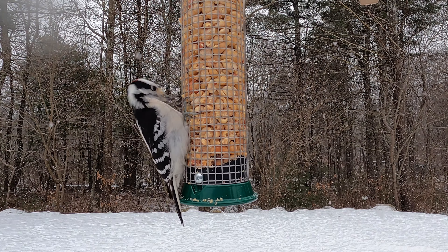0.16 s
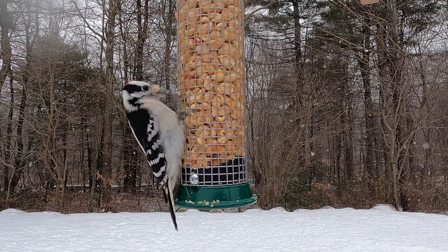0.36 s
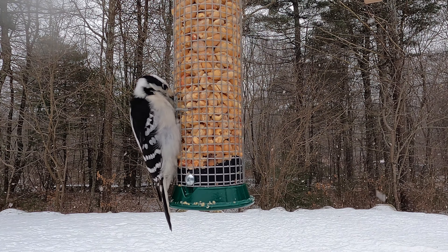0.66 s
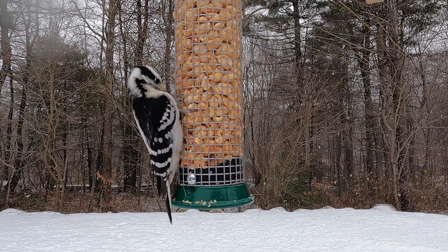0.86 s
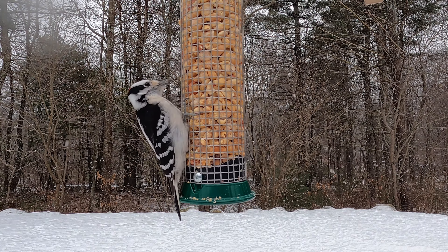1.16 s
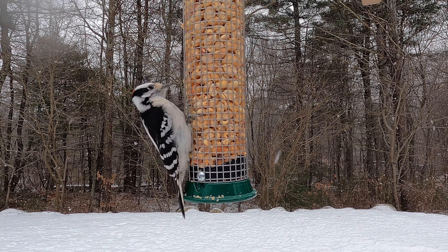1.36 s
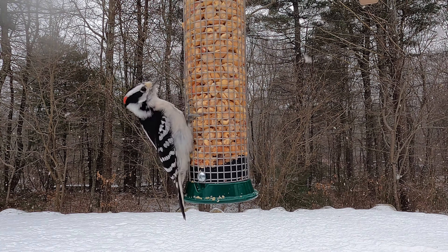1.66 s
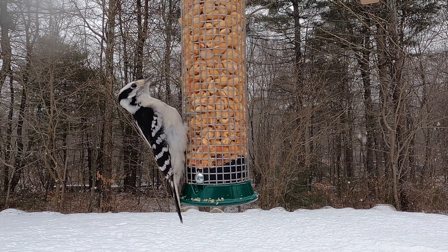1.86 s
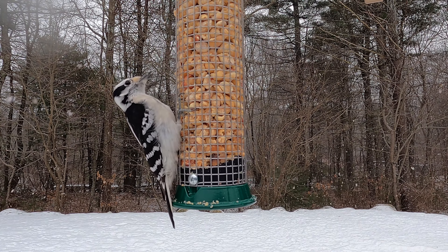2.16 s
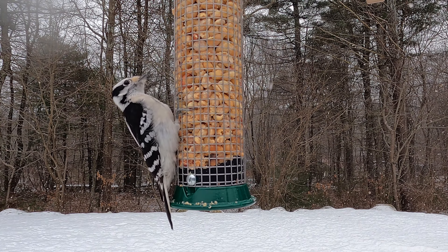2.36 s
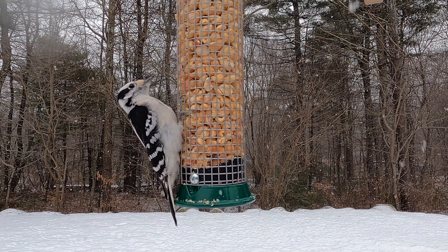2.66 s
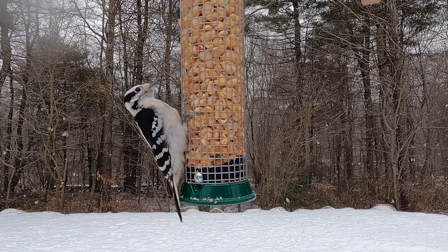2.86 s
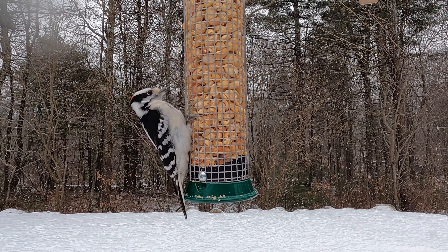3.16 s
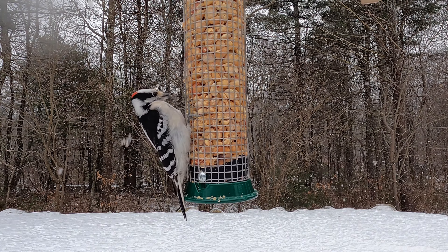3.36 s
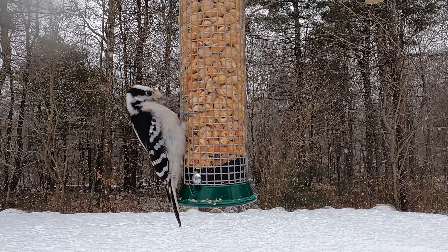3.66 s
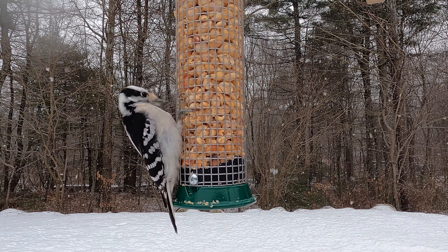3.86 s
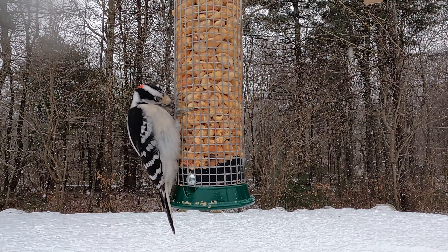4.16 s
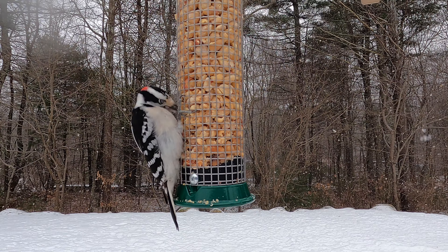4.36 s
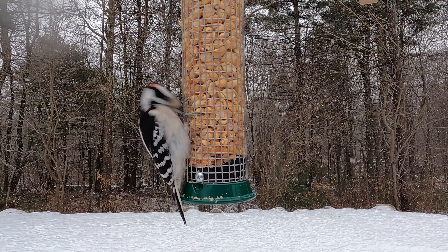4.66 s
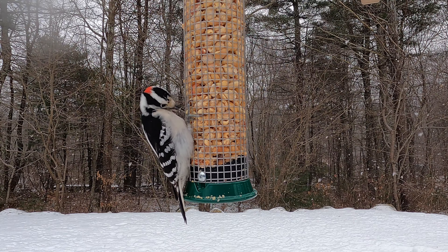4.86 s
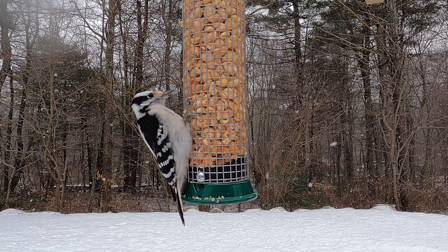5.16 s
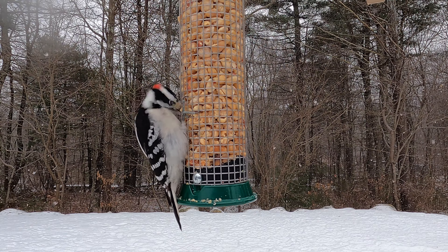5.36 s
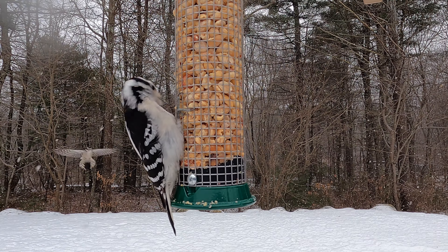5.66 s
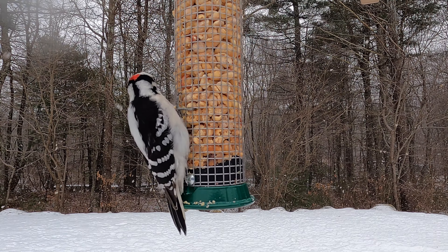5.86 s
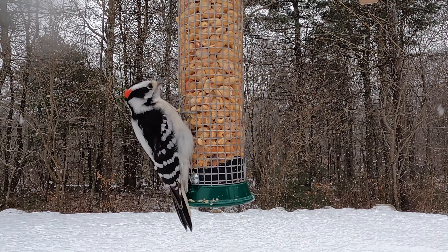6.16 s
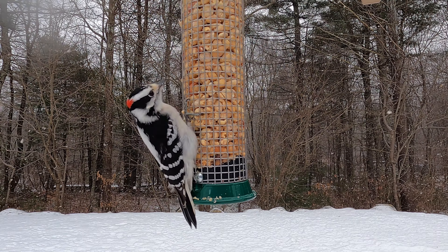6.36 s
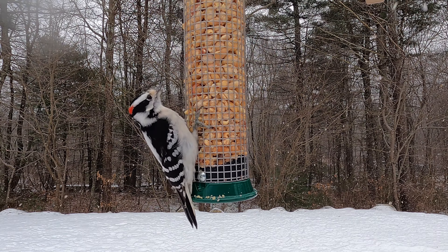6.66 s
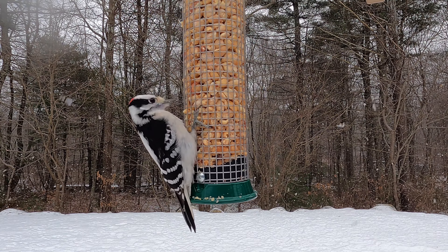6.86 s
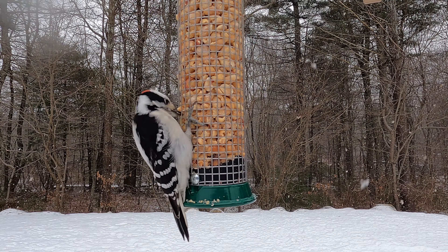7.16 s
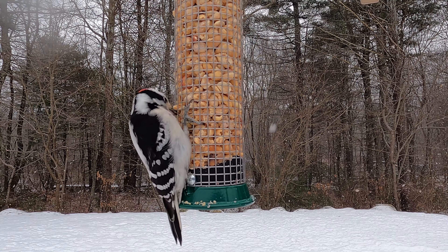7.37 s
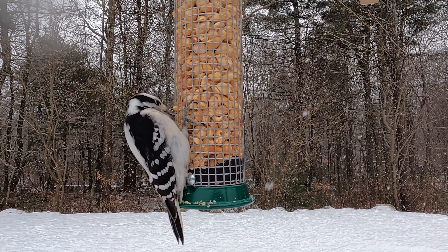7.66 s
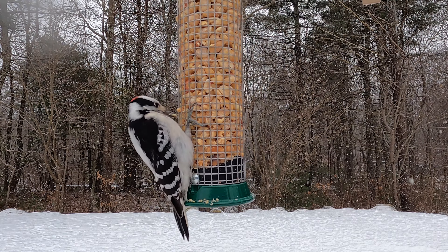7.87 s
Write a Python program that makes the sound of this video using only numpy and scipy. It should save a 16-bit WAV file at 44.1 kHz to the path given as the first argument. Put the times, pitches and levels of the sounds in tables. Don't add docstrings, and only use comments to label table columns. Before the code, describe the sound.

A small woodpecker pecks sharply at peanuts in a wire feeder while small birds chirp, and a second bird clatters in over low wind rumble.

```python
import sys
import numpy as np
from scipy import signal
from scipy.fft import rfft, irfft, next_fast_len
from scipy.io import wavfile
from scipy.ndimage import uniform_filter1d, map_coordinates

SR = 44100
rng = np.random.default_rng(int(sys.argv[2]) if len(sys.argv) > 2 else 0)


def master_out(mix):
    frames = np.transpose(np.atleast_2d(mix))
    ceiling = np.clip(frames, -1, 1)
    pcm = np.round(ceiling * 32767).astype(np.int16)
    wavfile.write(sys.argv[1], SR, pcm)


def volts_from_decibels(level):
    exponent = np.asarray(level, float) / 20
    return 10 ** exponent


N = 353461
OPPOSITE = np.array([[1], [-1]])


def shape(x, points):
    size = next_fast_len(x.shape[-1])
    hz, db = np.transpose(points)
    bins_hz = np.arange(size // 2 + 1) * SR / size
    gain = volts_from_decibels(np.interp(np.log(bins_hz + 1), np.log(hz), db))
    return irfft(rfft(x, size) * gain, size)[..., :x.shape[-1]]


def band(x, hz, width_hz):
    return signal.lfilter(*signal.iirpeak(min(hz, .45 * SR), hz / width_hz, fs=SR), x)


def twice(x, hz, width_hz):
    return band(band(x, hz, width_hz), hz, width_hz)


def unit(x):
    return x / np.sqrt(np.mean(x ** 2))


def walk(rate):
    k = int(SR / rate)
    held = np.repeat(rng.standard_normal(N // k + 1), k)
    return 2.6 * uniform_filter1d(uniform_filter1d(held, k), k)[:N]


def add(track, s, x):
    i = int(s * SR)
    track[i:i + len(x)] += x[:N - i]


def swells(t, rows, bed_db, colour_db, steps, rise):
    total = volts_from_decibels(np.array(bed_db))[:, None] ** 2
    for s, ms, db, tilt_db in rows:
        fade_db = -12000 * np.maximum(t - s, (s - t) / rise) / ms
        tint_db = (colour_db + tilt_db * np.array(steps))[:, None]
        total = total + volts_from_decibels(db + fade_db + tint_db) ** 2
    return 10 * np.log10(total)


def grit(size, grain_db):
    return rng.standard_normal(size) * volts_from_decibels(grain_db * np.minimum(rng.exponential(size=size), 3))


# f/Hz, level/dB
UNLIKE = [(30, -22), (70, -34), (140, -9.5), (260, -10.5), (600, -7), (2000, -7), (8000, -6.5), (13000, 1)]


def pair():
    mid, side = rng.standard_normal((2, N))
    return mid + shape(side, UNLIKE) * OPPOSITE


# f/Hz, level/dB
WIND_TONE = [(8.8, -28), (15, 2.5), (27, 0.5), (41, -1.5), (86, 3), (291, -24), (400, -32), (650, -39),
             (1100, -100)]
# f/Hz, level/dB
WIND_BANDS = [
    [(42, 0), (50, -4), (65, -30)],
    [(38, -30), (50, -4), (60, 0), (110, 0), (130, -4), (170, -30)],
    [(100, -30), (130, -4), (155, 0)],
]
# t/s, fade/ms, strength/dB, slow buffeting over the strength/dB
GUSTS = [(.2, 160, -55.5, 5.5), (.8, 210, -57, 2), (1.76, 230, -47, -3), (2.03, 340, -48, 6.5),
         (2.882, 104, -39, 2), (4.13, 170, -49.5, -2.5), (4.53, 540, -55, 3), (5.1, 320, -55, -7),
         (5.6, 330, -52.5, -13.5), (5.99, 270, -46.5, 1.5), (6.25, 350, -54, -15), (6.75, 173, -45.5, 4.5),
         (7.05, 310, -51.5, 5.5), (7.62, 120, -56, -2)]


def wind():
    noise = shape(pair(), WIND_TONE)
    t = np.arange(0, N, 16) / SR
    levels = swells(t, GUSTS, bed_db=(-58.5, -57.5, -64), colour_db=(0, -2, -8.5),
                    steps=(0.93, 0, -0.52), rise=0.79)
    levels = np.repeat(levels, 16, axis=1)[:, :N]
    out = np.zeros((2, N))
    for db, part in zip(levels, WIND_BANDS):
        throb_db = 1.26 * walk(14)
        out += unit(shape(noise, part)) * volts_from_decibels(db + throb_db)
    return out


def sleet():
    hits = (rng.random(N) < 7 / SR) * volts_from_decibels(-50 + 2 * rng.standard_normal(N))
    return twice(hits, 11500, 900.) + volts_from_decibels(-22) * band(hits, 7000., 6000.)


# f/Hz, level/dB
CRACKLE_TONE = [(150, -32), (260, -1.5), (750, -3.5), (1200, 6), (2000, 2.5), (3000, 3), (4000, 4.5),
                (8000, 2), (9300, -6), (12500, -6)]
# t/s, fade/ms, level/dB, brightness per step up the colours/dB
STIRS = [(.1, 810, -81, 5.5), (.62, 350, -77, 5), (1.23, 310, -71, 2.5), (1.45, 150, -72, -0.5),
         (1.74, 190, -69, -0.5), (1.83, 260, -64.5, -8), (1.97, 224, -64, -1.5), (2.9, 76, -65.5, -1),
         (3.3, 170, -79, 1.5), (4.02, 230, -66, -4.5), (4.25, 207, -62, -3.5), (5.0, 1130, -72, -2),
         (5.62, 440, -67.5, -2), (5.958, 265, -60, -2), (6.11, 30, -70.5, -11), (6.235, 89, -50, -2),
         (6.3, 360, -62, -7.5), (6.72, 310, -65.5, -1), (7.1, 180, -66, -6), (7.35, 130, -73, -6),
         (7.563, 106, -55, -5), (7.95, 290, -78.5, 3.5)]


def rustle():
    colour_hz, width_hz = (470., 1500., 5800., 10500.), (650., 1600., 3000., 4500.)
    t = np.arange(0, N, 128) / SR
    levels = swells(t, STIRS, bed_db=(-77.5, -81, -84, -81), colour_db=(-3, 0.5, -2.5, -7),
                    steps=(-1.47, 0.76, 1.92, 1.2), rise=0.83)
    per_hz = levels - 10 * np.log10(width_hz)[:, None]
    noise = shape(pair() * volts_from_decibels(2.32 * rng.exponential(size=N)), CRACKLE_TONE)
    hz, s, cells = signal.stft(noise, SR, nperseg=512, noverlap=384)
    place = np.interp(np.log(hz + 1), np.log(colour_hz), range(4))
    grid = np.meshgrid(place, np.arange(len(s)), indexing="ij")
    patches = rng.standard_normal((12, len(s)))
    patches = unit(uniform_filter1d(uniform_filter1d(patches, size=9), size=9))
    db = map_coordinates(per_hz, grid, order=1, mode="nearest")
    db += 2.4 * map_coordinates(patches, [grid[0] * 11 / 3, grid[1]], order=1)
    out = signal.istft(cells * volts_from_decibels(db + 36.5), SR, nperseg=512, noverlap=384)[1][:, :N]
    return out * volts_from_decibels(.8 * walk(50))


WOBBLE = .005
# t/s, length/ms, first f/Hz, last f/Hz, level/dB
FALLS = [
    (1.545, 30, 3800, 3300, -67.5),
    (1.665, 28, 3770, 3050, -62),
    (4.367, 49.7, 4560, 3120, -39),
    (4.485, 55, 4400, 2830, -42.5),
    (7.646, 55, 4630, 3570, -62.5),
    (7.804, 50, 4470, 3420, -66.5),
]
# t/s, length/ms, first f/Hz, last f/Hz, level/dB
HELD = [
    (6.526, 32, 4270, 3340, -50),
    (6.646, 43, 4450, 3420, -46),
]
# t/s, level/dB
FAR_FALLS = [(.415, -72), (0.863, -67.5), (3.405, -80), (3.535, -80), (3.672, -78.5), (4.015, -68.5),
             (6.827, -63.5)]
# t/s, length/ms, first f/Hz, last f/Hz, level/dB
RISES = [
    (.102, 31, 2350, 3100, -74),
    (3.776, 59, 2410, 3770, -50.5),
]
# t/s, length/ms, first f/Hz, last f/Hz, level/dB
SEEPS = [(.172, 30, 3600, 2800, -74), (1.226, 30, 7000, 7400, -73), (1.262, 22, 4400, 4600, -72),
         (1.38, 32, 4450, 4900, -62), (1.922, 46, 2800, 4030, -52), (2.305, 49, 2900, 3840, -72),
         (2.853, 33, 2350, 3950, -54), (2.884, 15, 3950, 3860, -58), (2.868, 16, 6400, 7640, -67),
         (2.92, 18, 2000, 2190, -63.5), (3.105, 36, 2730, 3720, -56), (3.125, 17, 5800, 5720, -66),
         (3.772, 10, 4700, 5100, -68), (3.915, 46, 7100, 8000, -70), (4.35, 22, 7300, 7700, -70),
         (4.63, 29, 7200, 8000, -83), (7.235, 36, 8000, 5740, -76), (7.31, 31, 7540, 6100, -79),
         (7.788, 27, 7300, 7900, -72)]
# t/s, length/ms, first f/Hz, last f/Hz, level/dB
BUZZES = [(.718, 10, 6900, 8200, -69), (1.345, 22, 4650, 5000, -64), (1.39, 18, 4700, 4850, -64),
          (1.503, 20, 5450, 5700, -69), (1.926, 24, 5700, 6900, -63), (3.737, 38, 5600, 5300, -70),
          (3.739, 40, 2140, 1750, -70), (3.768, 16, 6800, 7900, -74), (3.786, 13, 5000, 3900, -71)]
# t/s, length/ms, first f/Hz, last f/Hz, level/dB
REEDS = [
    (3.947, 44, 2450, 3200, -60),
    (6.544, 15.7, 2690, 2520, -54),
]


def whistles():
    out, wobble, hoarse = np.zeros(N), 1 + WOBBLE * walk(400), walk(700)
    far = [(s, 46, 4200, 3130, db) for s, db in FAR_FALLS]
    fall_db, rise_db, reed_db, pure_db = (-21.5, -31, -55), (-13, -34, -28), (-6, -40, -32), (-30, -60, -60)
    kinds = [(FALLS, fall_db, .1, 1.3), (HELD, fall_db, .1, .35), (RISES, rise_db, .1, 1.3),
             (REEDS, reed_db, .15, .5), (SEEPS, pure_db, .2, .7), (far, pure_db, .4, .7),
             (BUZZES, pure_db, .55, .6)]
    mirror_hz = 24000
    for rows, over_db, rough, power in kinds:
        for s, ms, first_hz, last_hz, db in rows:
            u = np.linspace(0, 1, int(ms * SR / 1000))
            here = slice(int(s * SR), int(s * SR) + len(u))
            glide = u + 0.023 * np.sin(2 * np.pi * u + np.pi)
            hz = first_hz + (last_hz - first_hz) * glide
            phase = 2 * np.pi * np.cumsum(hz * wobble[here]) / SR + rough * hoarse[here]
            swell = np.sin(np.pi * u ** 1.08) ** power
            low = (u if last_hz < first_hz else 1 - u) ** 0.88
            mirror = volts_from_decibels(-5) * np.sin(2 * np.pi * mirror_hz * u * ms / 1000 - 3 * phase)
            third = (np.sin(3 * phase) + mirror) * np.clip((mirror_hz / 2 - 3 * hz) / 300, 0, 1)
            overtones = [2 * low * np.sin(2 * phase), third, np.sin(4 * phase)]
            tone = np.sin(phase) + volts_from_decibels(over_db) @ overtones
            add(out, s, np.sqrt(2) * volts_from_decibels(db) * tone * swell)
    return out * volts_from_decibels(.7 * walk(200))


# t/s, low voice f/Hz, high voice f/Hz, low level/dB, high level/dB
ARCH = [(1.341, 2290, 3720, -63, -57), (1.365, 2540, 3890, -60, -54), (1.383, 2820, 4080, -52.5, -59),
        (1.415, 2980, 4250, -54, -55), (1.445, 2950, 4380, -51.5, -59), (1.452, 2880, 4200, -53, -62),
        (1.485, 2895, 4200, -54, -65), (1.503, 2734, 4240, -58, -87), (1.525, 2900, 4100, -57, -90)]
# t/s, length/s, first f of the low voice/Hz, level/dB
CHIPS = [
    (0.719, 0.039, 3130, -47),
    (4.248, 0.037, 3106, -41),
]
# t as share of length, low f and high f as shares of the first, low level/dB, high level/dB
CHIP_COURSE = [(0, 1, 1.43, -18, -32), (.22, .97, 1.4, -4, -9), (.42, .92, 1.31, 0, -4),
               (.7, 0.85, 1.2, -3, -4), (.85, .83, 1.2, -9, -5), (1, 0.85, 1.21, -20, -16)]
MIXES = [(2, 0), (0, 2), (-1, 1), (-1, 2), (1, 1), (1, 2), (0, 3), (2, 2)]


def two_voiced_calls():
    out, waver = np.zeros(N), walk(260)
    chip_mix_db = (-16, -16, -24, -15, -30, -34, -36, -38)
    arch_mix_db = (-12, -36, -30, -30, -34, -40, -40, -40)
    calls = [(ARCH, arch_mix_db, 1.5)]
    for s, length, hz, db in CHIPS:
        note = [(s + u * length, hz * low, hz * high, db + low_db, db + high_db)
                for u, low, high, low_db, high_db in CHIP_COURSE]
        calls.append((note, chip_mix_db, 2.5))
    times = np.array(MIXES)
    share = np.abs(times) / np.abs(times).sum(axis=1, keepdims=True)
    for note, mix_db, rough_db in calls:
        s, *columns = np.transpose(note)
        t = np.arange(s[0], s[-1], 1 / SR)
        smooth = np.array([uniform_filter1d(np.interp(t, s, c), size=150, mode="nearest") for c in columns])
        voices_hz, voices_db = smooth[:2], smooth[2:]
        rough = np.array([waver[int((s[0] + k / 20) * SR):][:len(t)] for k in range(10)])
        phase = 2 * np.pi * np.cumsum(voices_hz * (1 + .5 * WOBBLE * rough[:2]), axis=1) / SR
        tone = np.sum(volts_from_decibels(voices_db + .7 * rough[:2]) * np.sin(phase), axis=0)
        level = share @ voices_db + np.array(mix_db)[:, None] + rough_db * rough[2:]
        tone = tone + np.sum(volts_from_decibels(level) * np.sin(times @ phase + .6 * rough[2:]), axis=0)
        add(out, s[0], tone * signal.windows.tukey(len(t), .15))
    return out


def trunks(x):
    t = np.arange(SR // 2) / SR
    tail = rng.standard_normal((2, len(t))) * 1000. ** (-t / .3) * np.minimum(t / .012, 1)
    tail = tail / np.sqrt(np.sum(tail ** 2) / 2)
    return volts_from_decibels(-17) * signal.fftconvolve(x[None], tail, axes=1)[:, :N]


# t/s, length/ms, f/Hz,
# width/Hz, level/dB
SCRAPES = [(0.53, 90, 7700, 2300, -68), (1.342, 86, 7600, 1500, -66), (1.4, 190, 264, 130, -67),
           (1.675, 113, 1660, 130, -61), (1.684, 127, 1250, 200, -61), (1.691, 98, 2820, 900, -66.5),
           (1.78, 58, 980, 700, -59), (1.872, 85, 2100, 450, -59), (1.872, 64, 2820, 400, -58),
           (1.95, 102, 2000, 350, -60.5), (1.964, 79, 2660, 500, -60), (1.821, 160, 890, 900, -64),
           (5.597, 40, 2800, 302, -61.5), (5.488, 32, 3460, 900, -60.5), (2.79, 147, 1100, 1830, -64),
           (3.068, 76, 3370, 6000, -72.5), (2.458, 104, 576, 510, -72.5), (3.221, 200, 1330, 1400, -76.5),
           (5.071, 102, 2000, 3000, -68), (5.44, 37, 2850, 1690, -62), (6.117, 18, 7600, 6000, -51),
           (6.212, 40, 1500, 398, -43), (6.614, 30, 4740, 4000, -63), (6.94, 134, 6640, 300, -66),
           (6.953, 11, 10900, 4000, -58), (7.007, 20, 11500, 3100, -57), (7.33, 71, 760, 200, -68),
           (7.52, 70, 520, 400, -61.5), (7.521, 73, 1250, 300, -62)]


def scrapes():
    out = np.zeros(N)
    for s, ms, hz, width_hz, db in SCRAPES:
        drag = unit(twice(grit(16384, 1.5), hz, 1.2 * width_hz))[:int(ms * SR / 1000)]
        add(out, s, volts_from_decibels(db) * drag * signal.windows.tukey(len(drag), .2))
    return out * volts_from_decibels(.6 * walk(90))


# t/s, level/dB, drive/ms
RINGS = [(0.069, -77, 18), (.248, -65.5, 42), (1.013, -73.5, 65), (1.242, -66.5, 16), (1.337, -70.5, 38),
         (4.725, -70, 26), (4.875, -71.5, 29), (5.049, -72.5, 32), (5.49, -66.5, 36), (5.598, -70, 61),
         (5.685, -64.5, 43), (5.855, -69.5, 45), (6.76, -65.5, 16)]
# f/Hz, level/dB, t60/s
MESH_MODES = [(1907, 4, 0.15), (2060, -6.5, 0.012), (1780, -7, 0.15)]


def mesh():
    drive, t = np.zeros(N), np.arange(8192) / SR
    for s, db, ms in RINGS:
        add(drive, s, volts_from_decibels(db + 33.0) * rng.standard_normal(8192) * np.exp(-1000 * t / ms))
    return sum(volts_from_decibels(db) * band(drive, hz, np.log(1000) / np.pi / t60) for hz, db, t60 in MESH_MODES)


# t/s, level/dB, f/Hz, t60/ms
THUMPS = [(.2212, -53, 520, 12), (1.753, -26, 111, 24), (4.119, -28, 81, 52), (4.3718, -49, 480, 7.4),
          (5.949, -39, 1240, 11), (5.958, -26.5, 1870, 1.6), (5.9602, -35.5, 1100, 22),
          (5.9606, -32.5, 544, 32), (5.964, -51, 70, 54), (6.005, -44.5, 605, 12), (6.067, -52, 610, 18),
          (6.068, -55, 1560, 14), (6.097, -47, 555, 23), (6.098, -47, 1510, 9.2), (6.099, -40, 148, 30)]


def thumps():
    out, t = np.zeros(N), np.arange(4096) / SR
    wings = [(6.492 + k * .043, -44 - .7 * k, 255, 42) for k in range(6)]
    for s, db, hz, ms in THUMPS + wings:
        add(out, s, volts_from_decibels(db) * np.sin(2 * np.pi * hz * t) * 1000. ** (-1000 * t / ms))
    return out


def strikes(table, modes, rise, grain_db, blow, dull, size):
    out = np.zeros(N)
    settle = np.cos(np.linspace(0, np.pi / 2, size))
    for s, peak_db, knock_db, snap_db, ms in table:
        t = np.arange(size) * 1000 / SR / max(ms, .3)
        contacts = grit(size, grain_db) * np.minimum(t / rise, 1) * np.exp(-t)
        clean = min(1, 1.3 / ms) ** 2 if ms < 10 else 1
        contacts[np.argmax(t > rise)] -= blow * clean
        levels = volts_from_decibels(peak_db + np.array([knock_db, -18., snap_db]))
        hit = np.zeros(size)
        for k, (mode, level) in enumerate(zip(modes, levels)):
            part = (-1) ** k * twice(contacts, *mode)
            part = part * np.exp(-dull * k * t ** 2) * settle
            hit += level * part / np.sqrt(np.max(uniform_filter1d(part ** 2, size=200)))
        add(out, s, hit)
    return out


# t/s, level/dB, knock level/dB, snap level/dB, settling/ms
JOLTS = [(0.4907, -73, -10, -17, 61), (1.0111, -46.5, -39, -38, 61), (4.1759, -46.5, -11.5, -21, 37),
         (5.4919, -67, -12, -27, 74), (5.52, -59.5, 3.5, -13, 22), (5.5997, -52, -22, -36, 22),
         (5.682, -38.5, -30, -43, 21), (6.0675, -44, -16.5, -26, 87), (6.135, -26, -20.5, -19, 50),
         (6.2014, -23, -21, -20.5, 7.4), (6.2076, -22, -24, -25, 77), (6.757, -71, -19, -30, 20),
         (6.9052, -40, -29, -35, 160), (6.9535, -32.5, -30, -31, 70), (7.007, -33.5, -29.5, -27, 56),
         (7.5078, -35, -28.5, -29.5, 73), (7.6, -48, -16, -30, 28)]
# f/Hz, width/Hz
JOLT_MODES = [
    (1500, 4460),
    (4200, 4200),
    (10000, 9800),
]
# f/Hz, width/Hz, level/dB
TUBE = [(293, 16, 18), (520, 14, 13), (733, 11, 14), (1050, 9.3, 13), (1323, 18, 10), (1600, 23, 4),
        (2740, 24, -10), (402, 19, 17.5), (633, 53, 8), (930, 14, 3), (1440, 190, -5), (2000, 12, 4),
        (2350, 5.9, 3.5)]


def jolts():
    nuts = strikes(JOLTS, JOLT_MODES, rise=0.035, grain_db=6.0, blow=2.2, dull=0.31, size=12000)
    return nuts + volts_from_decibels(3) * sum(volts_from_decibels(db) * band(nuts, hz, width_hz) for hz, width_hz, db in TUBE)


# t/s, level/dB, hollow knock level/dB, contact/ms
PECKS = [(0.2203, -26.5, -15, 1.3), (0.26, -46.5, -12, 1.8), (0.529, -36.5, -19.5, 2.2),
         (0.596, -38.5, -35, 7), (0.662, -30.5, -22.5, 3), (1.1767, -37, -29, 2), (1.244, -47, -15, 3.9),
         (1.284, -37, -27, 2.3), (1.687, -36, -15, 5.3), (1.994, -39.5, -34, 3), (3.9456, -45, -11.5, 3.6),
         (4.0598, -40, -22, 1.9), (4.174, -35.5, -11.5, 3.1), (4.371, -29, -12.5, 1.496),
         (4.7112, -29, -18, 2.6), (4.98, -65, -1, 2.5), (5.4031, -29, -20.5, 2), (5.727, -34.5, -20, 1.75),
         (7.1707, -29, -22.5, 1.2), (7.1904, -43.5, -23, 1.3), (7.457, -44.5, -31, 3.1),
         (7.903, -46.5, -22, 7)]
# t/s, snap level/dB, body level under the snap/dB
TICKS = [(.41, -74, -4), (.419, -51.5, -4), (.458, -65, -8), (.676, -62, -12), (.681, -56, -4),
         (1.088, -61, -11), (1.379, -47, -5), (1.549, -62, -19), (1.868, -71, 7.5), (2.6048, -56, -2),
         (2.82, -64, -4), (2.956, -66, -4), (3.096, -70, -8), (3.3094, -59, -8), (3.352, -70, 6),
         (3.47, -68, -12), (3.73, -74, -2), (3.936, -64, -14), (4.144, -75.5, 10), (4.448, -70, 4),
         (5.015, -61.5, 1.5), (5.4045, -54, -21), (5.879, -53, -0.5), (5.895, -62, -10), (5.908, -63, 2),
         (6.02, -64, -8), (6.363, -70, -7), (6.5286, -54.5, 1), (6.532, -51, -1), (6.58, -71, 7.5),
         (6.631, -56.5, 1), (6.646, -53, 1), (6.702, -72, 5), (6.8054, -61, -11), (7.299, -67, 1.5)]
# f/Hz, width/Hz
PECK_MODES = [
    (1450, 1560),
    (5200, 5100),
    (9000, 7500),
]


def pecks():
    rows = [(s, db, knock_db, -48.5 - 5.2 * ms, ms) for s, db, knock_db, ms in PECKS]
    for s, db, body_db in TICKS:
        rows.append((s, db + body_db + 14.0, -19.5 + 1.5 * body_db, -21.0 - body_db, 1.5))
    hits = strikes(rows, PECK_MODES, rise=0.8, grain_db=6.5, blow=13., dull=.003, size=1024)
    return hits + volts_from_decibels(-22) * np.roll(hits, int(.0095 * SR))


def place(x, left_over_right_db):
    return x * volts_from_decibels(left_over_right_db / 2 * OPPOSITE)


# f/Hz, level/dB
SHADE = [(100, -30), (300, -26), (1000, -33), (3000, -31), (8000, -8.5), (13000, -12)]


def scene():
    birds = whistles() + two_voiced_calls()
    bill, nuts, drags, feeder = pecks(), jolts(), scrapes(), mesh() + thumps() + sleet()
    near = bill + nuts + drags + feeder
    placed = place(bill, -0.39) + place(nuts, -2) + place(drags, 0.14)
    placed = placed + place(feeder, 0.025) + place(birds, -0.13)
    shade = shape(np.roll(near, 37), SHADE) * OPPOSITE
    echo = trunks(birds + volts_from_decibels(-12) * near)
    return placed + shade + echo + wind() + rustle()


def roll_off(x):
    return signal.sosfilt(signal.butter(12, 14500, fs=SR, output="sos"), x)


# f/Hz, left lead/radians
PORTS = [(0, 0), (3190, -1.1), (5080, -0.2), (10800, 0.0), (13900, 0.2)]
# f/Hz, level/dB
MIC = [(12000, 2), (13000, -2.5), (13800, -9), (14600, -17), (15500, -30)]


def record(dry):
    size = next_fast_len(N)
    lead = np.interp(np.arange(size // 2 + 1) * SR / size, *np.transpose(PORTS))
    turned = rfft(dry, size) * np.exp(.5j * lead * OPPOSITE)
    ports = irfft(turned, size)[:, :N]
    return roll_off(shape(ports, MIC))


dry = scene()
out = record(dry)
master_out(out)
```